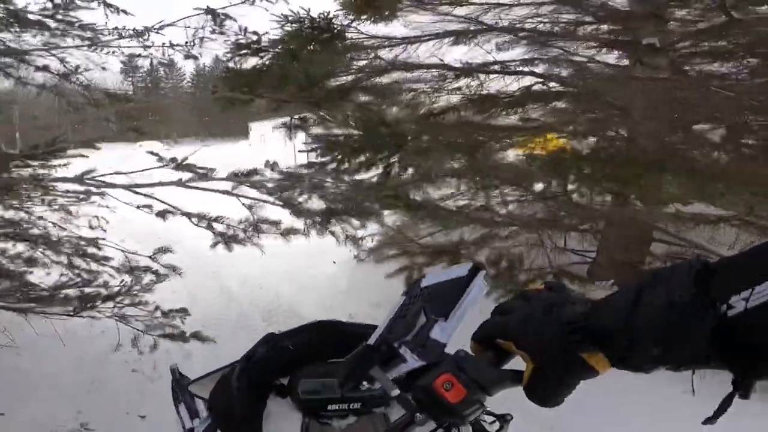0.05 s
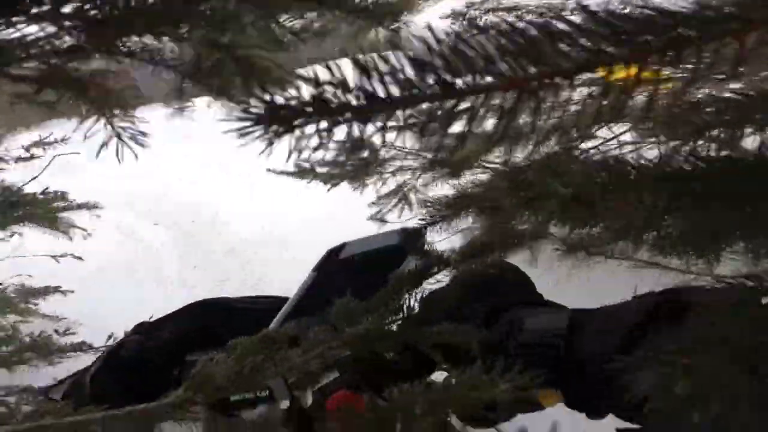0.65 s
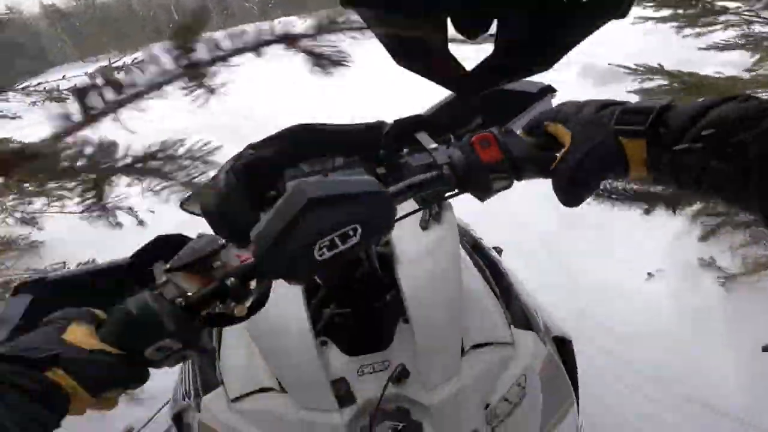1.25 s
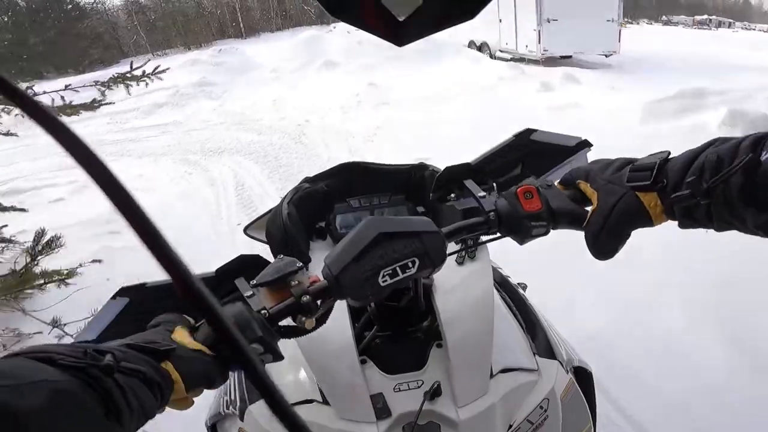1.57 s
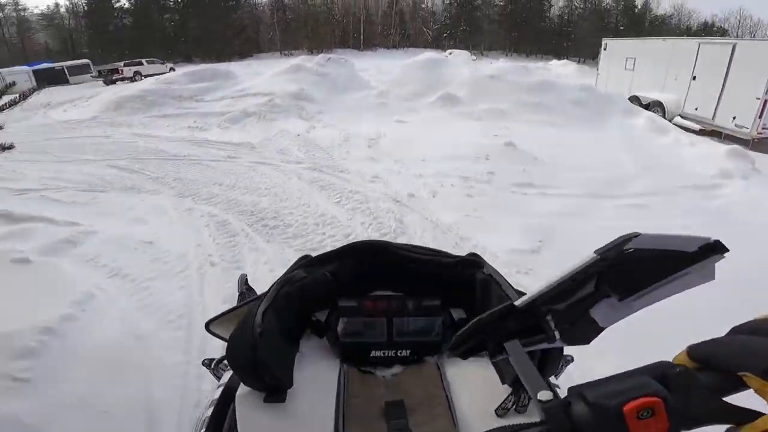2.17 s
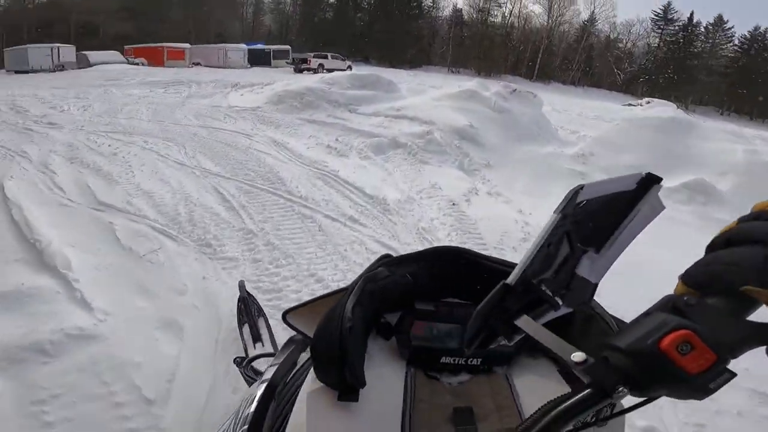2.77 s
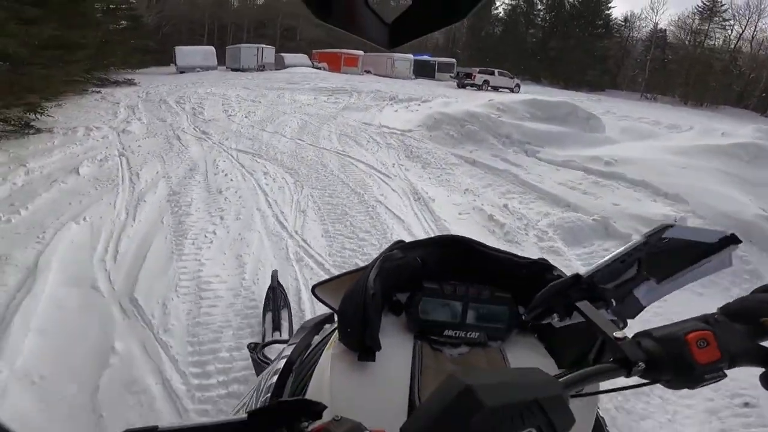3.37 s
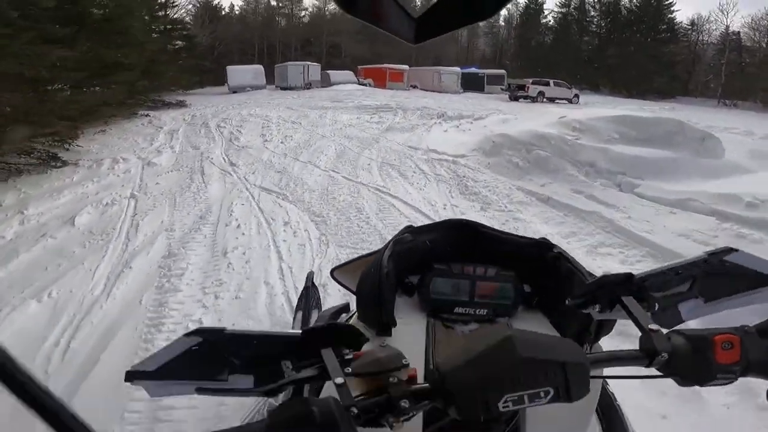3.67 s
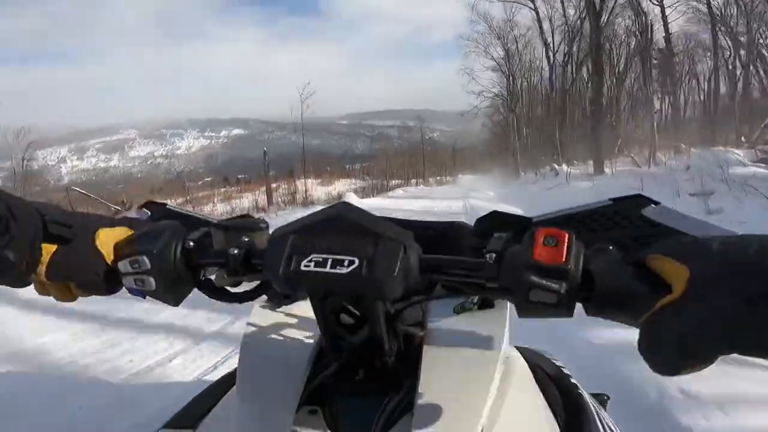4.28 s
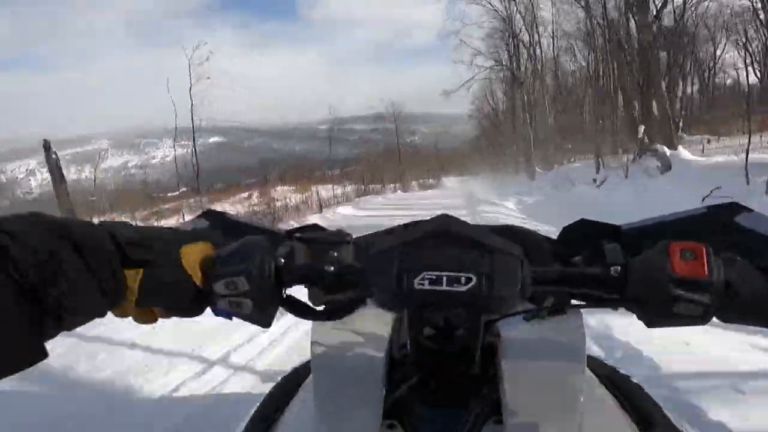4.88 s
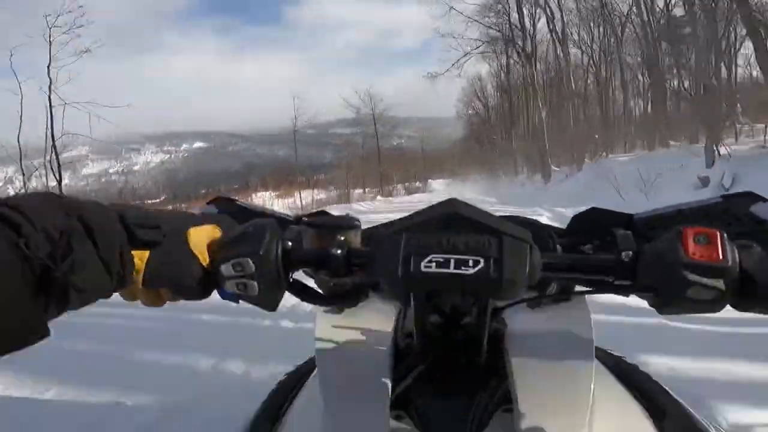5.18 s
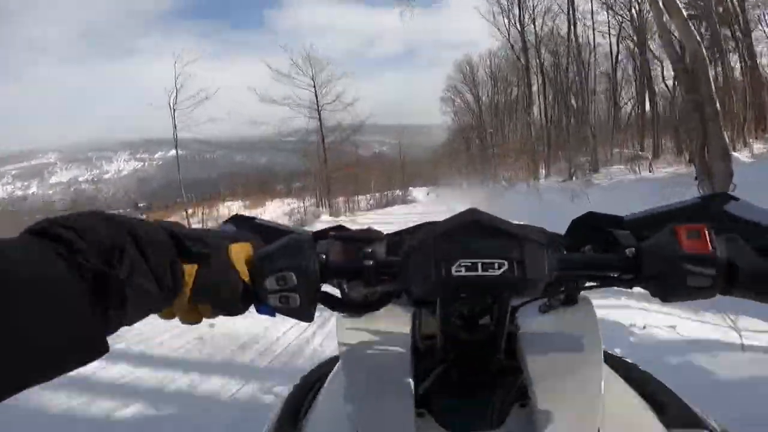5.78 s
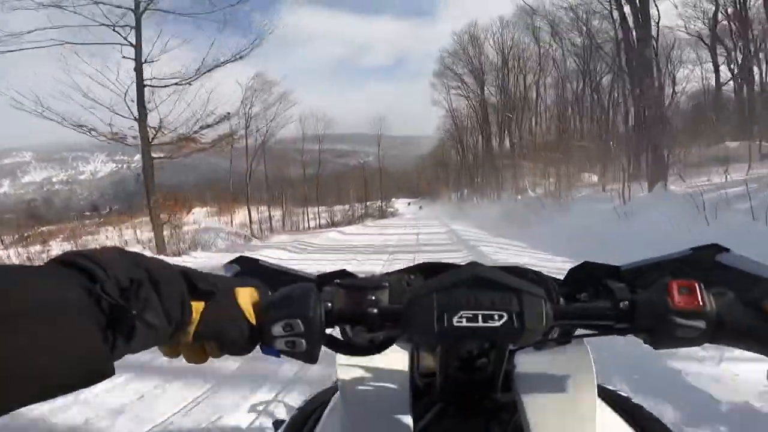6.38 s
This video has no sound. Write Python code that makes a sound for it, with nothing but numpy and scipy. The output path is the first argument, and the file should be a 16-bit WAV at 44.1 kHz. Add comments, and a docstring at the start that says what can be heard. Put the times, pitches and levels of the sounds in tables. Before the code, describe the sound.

Close snowmobile engine pushes slowly through scraping, snapping branches, belt chirping, then speeds down a trail in wind and eases off.

```python
"""A snowmobile engine lopes near idle, close below a microphone on the rider's helmet.
The three-cylinder four-stroke revs twice, exhaust booming and belt chirping, while spruce
branches scrape and snap past; then it crawls over open snow. After a short hush it runs fast
down a trail: a higher engine note, the whine of the track drive, wind buffeting the
microphone, one bump, and then the throttle eases."""
import sys
import numpy as np
from scipy import signal
from scipy.fft import rfft, irfft
from scipy.io import wavfile
from scipy.ndimage import uniform_filter1d

SR = 44100
rng = np.random.default_rng(int(sys.argv[2]) if len(sys.argv) > 2 else 0)


def persist_wave(psi):
    """Save psi, clipped to +-1, as 16-bit WAV."""
    counts = np.round(np.clip(psi, -1, 1) * 32767).astype(np.int16)
    wavfile.write(sys.argv[1], SR, np.atleast_2d(counts).T)


N = 292824
T, HZ = np.arange(N) / SR, np.fft.rfftfreq(N, 1 / SR)


def amp(db):
    """Decibels to gain."""
    return 10 ** (np.asarray(db) / 20)


def unit_rms(x):
    """Scales to rms 1."""
    return x / np.sqrt(np.mean(x ** 2) + 1e-20)


def noise():
    """White noise of rms 1."""
    return rng.standard_normal(N)


def sine(turns):
    """A tone of peak 1 from its phase in turns."""
    return np.sin(2 * np.pi * turns)


def swell(centre_s, half_s):
    """A smooth rise and fall of height 1."""
    return np.exp(-((T - centre_s) / half_s) ** 2)


def curves(rows):
    """Each column of a table, joined by straight lines in time."""
    times, *columns = np.transpose(rows)
    return [np.interp(T, times, column) for column in columns]


def spectrum_gain(points):
    """A spectrum as gain on a log-frequency axis, falling steeply past its ends."""
    hz, db = np.transpose(points)
    octave, known = np.log2(HZ + 1), np.log2(hz + 1)
    outside = np.maximum(known[0] - octave, 0) + np.maximum(octave - known[-1], 0)
    return amp(np.interp(octave, known, db) - 20 * outside)


def colour(x, points, band_hz=(0, SR / 2)):
    """Filters by (freq_hz, gain_db) points; the result has rms 1 inside the band."""
    spectrum = rfft(x) * spectrum_gain(points)
    in_band = (HZ >= band_hz[0]) * (HZ <= band_hz[1])
    return irfft(spectrum, N) / np.std(irfft(spectrum * in_band, N))


def wander(rate_hz):
    """Smooth random drift of rms 1, moving up to about the given rate."""
    count = 2048
    spectrum = rfft(rng.standard_normal(count)) / (1 + (HZ[:count // 2 + 1] / rate_hz) ** 4)
    return np.interp(T, np.linspace(0, T[-1], count), unit_rms(irfft(spectrum)))


def resonate(x, hz, width_hz):
    """Rings one resonance."""
    return signal.lfilter(*signal.iirpeak(hz, hz / width_hz, SR), x)


def response(hz, resonances):
    """Gain of a set of resonances for a tone at this pitch."""
    return sum(amp(db) / (1 + (2 * (hz - centre) / width) ** 2) for centre, width, db in resonances)


# skis and track on the snow below the rider: time_s, level_db
SNOW_LEVEL = [(0, -56), (.25, -63), (.6, -46), (1.55, -42), (1.78, -64), (2.2, -53.5), (3.74, -49)]
# hiss of the snow: freq_hz, gain_db
SNOW_SPECTRUM = [(800, -7.5), (2000, 1.5), (3200, 1), (5000, -11.5), (7500, -11.5), (9500, -22.5),
                 (12500, -25.5), (15000, -43)]


def snow():
    """A soft hiss under the skis and a faint rumble of the chassis."""
    level_db, = curves(SNOW_LEVEL)
    rumble = colour(noise(), [(12, -6), (25, -9), (45, -7.5), (70, -2.5)]) * amp(-38.5)
    hiss = colour(noise(), SNOW_SPECTRUM) * amp(level_db + 2.1 * wander(21))
    return hiss + rumble


# wind right on the microphone: freq_hz, gain_db
BUFFET_SPECTRUM = [(10, -8), (22, -11.5), (36, 8.5), (58, 1), (85, -4.5), (130, -7), (200, -20.5),
                   (400, -50.5)]
# air and snow rushing past the helmet: freq_hz, gain_db
ROAR_SPECTRUM = [(80, 11), (150, 1), (260, 8.5), (400, 0.5), (560, -4), (720, -16.5), (1000, -13.5)]


def wind():
    """Lumpy buffeting and the roar of air and flying snow build up at the start of the trail."""
    trail_s, build_s = 4.0, 0.14
    build_db = -6 * np.exp(-np.maximum(T - trail_s, 0) / build_s)
    lumps = colour(noise(), BUFFET_SPECTRUM)
    lumps /= np.sqrt(uniform_filter1d(lumps ** 2, size=5000))  # hold the level steady
    roar = colour(noise(), ROAR_SPECTRUM, band_hz=(370, 440))
    roar_db = -45.5 + 6.4 * fast_throttle() + wander(25)
    return (lumps * amp(-19) + roar * amp(roar_db)) * amp(build_db)


# the brake on the slow ride: centre_s, half_length_s, level_db
BRAKE_SQUEALS = [(.17, .09, -46), (0.662, 0.029, -44.5), (2.207, .14, -43), (3.5, 0.2, -43.5)]


def brake():
    """The brake squeals in a thin, unsteady whistle."""
    pitch_hz = 2040 * (1 + .009 * wander(70))
    envelope = sum(amp(db) * swell(s, half) for s, half, db in BRAKE_SQUEALS)
    return sine(np.cumsum(pitch_hz) / SR) * envelope * amp(3.5 * wander(30))


# track drive under the seat, its pitch set by ground speed: time_s, pitch_hz, level_db
TRACK_WHINE = [(4.12, 248, -31.5), (4.35, 253, -22), (4.6, 257, -25), (4.95, 267, -28.5), (5.5, 289, -33),
               (6.25, 301, -29), (6.64, 292, -29.5)]


def track():
    """Drive teeth mesh with the track in a fluttering tone."""
    hz, db = curves(TRACK_WHINE)
    turns = np.cumsum(hz) / SR + 0.058 * wander(34)
    harmonics_db = [-4, -25.5, -31, -33.5]
    tone = sum(amp(level) * sine(k * turns) for k, level in enumerate(harmonics_db, 1))
    return unit_rms(tone) * amp(db + 3.4 * wander(14))


# resonances of the gear case: centre_hz, width_hz, gain_db
GEAR_CASE = [(4385, 170, -56.5), (4820, 110, -57.5)]


def gears():
    """Meshing teeth whine with ground speed, louder at the case's resonances and under throttle."""
    meshes_per_track_cycle, floor_db = 16.5, -68.5
    hz = meshes_per_track_cycle * curves(TRACK_WHINE)[0]
    coast_db = -6.5 * (1 - fast_throttle())
    turns = np.cumsum(hz * (1 + .011 * wander(120))) / SR
    case_gain = amp(floor_db) + response(hz, GEAR_CASE)
    return np.sqrt(2) * sine(turns) * case_gain * amp(coast_db + 2.6 * wander(40))


def bump_and_ice():
    """The chassis thuds over a bump; later a chip of ice ticks against the hood."""
    bump_s, ice_s = 5.478, 6.146
    thud = colour(noise(), [(90, -10), (170, 0), (280, -2), (450, -13), (900, -30)])
    tick = colour(noise(), [(1100, -4.5), (1500, 6.5), (2100, -1), (2600, -16)])
    return amp(-11.5) * thud * swell(bump_s, .011) + amp(-36) * tick * swell(ice_s, .007)


# boughs rubbing on the windshield, an arm's length ahead, and one soft low thud of the sled:
# centre_s, half_length_s, level_db, pitch_hz
RUBS_AND_THUD = [(0.955, 0.028, -36, 936), (1.126, 0.029, -27, 975), (1.266, 0.024, -29, 676),
                 (1.345, 0.017, -24.5, 393), (1.555, .04, -23, 135), (1.604, .02, -32.5, 425)]


def rubs_and_thud():
    """Boughs set the plastic windshield groaning in narrow bands; the lowest band is the sled's thud."""
    sound = np.zeros(N)
    for s, half, db, hz in RUBS_AND_THUD:
        band = resonate(resonate(noise(), hz, 90), hz, 140)
        sound += unit_rms(band) * amp(db) * swell(s, half)
    return sound


# how closely the spruce presses in on the rider: time_s, closeness_db
THICKET = [(.2, -14), (.4, -8.5), (1.53, 1), (1.75, -8), (2, -9.5), (2.3, -46)]
# single boughs swishing past the microphone: centre_s, half_length_s, level_db
SWISHES = [(0.328, 0.024, -47), (0.956, 0.04, -49), (1.173, 0.042, -46), (1.289, .035, -41.5)]
# needles on helmet and hood: freq_hz, gain_db
NEEDLE_SPECTRUM = [(300, -6), (900, 14), (2000, 5.5), (3000, -3), (5500, 0), (7500, -8.5), (9500, -23),
                   (12500, -20), (15500, -35)]


def needles():
    """Spruce needles scrape past in clumps of tiny clicks."""
    near_db, = curves(THICKET)
    clicks_per_s = 4000
    clicks = noise() * amp(3.5 * np.minimum(rng.exponential(1, N), 5))
    clicks *= rng.random(N) < clicks_per_s / SR
    clicks *= amp(0.95 * wander(50))
    passing = amp(-46.5 + near_db) + sum(amp(db) * swell(s, half) for s, half, db in SWISHES)
    return colour(clicks, NEEDLE_SPECTRUM, band_hz=(3500, 14000)) * passing


# twigs on the helmet, right beside the microphone: start_s, strength_db, knock_offset_db
TWIG_SNAPS = [(.320, -24.5, -2.5), (0.336, -35.5, 5.5), (0.58, -36, -1), (0.95, -27.5, -7.5),
              (1.134, -30.5, -3.5), (1.157, -29.5, -2), (1.183, -24.5, -15.5), (1.204, -27.5, -18),
              (1.344, -30.5, 14), (1.389, -29.5, -2), (1.512, -20, 3), (1.523, -33, -6.5),
              (1.54, -23, -0.5), (1.744, -39.5, -15)]


def twigs():
    """Each twig snaps with a bright crack and a lower knock that lasts a little longer."""
    crack_decay_s, knock_decay_s = .0045, .01
    crack_envelope, knock_envelope = np.zeros(N), np.zeros(N)
    for start_s, db, knock_db in TWIG_SNAPS:
        age = np.maximum(T - start_s, 0)
        crack_envelope += amp(db) * (age > 0) * np.exp(-age / crack_decay_s)
        knock_envelope += amp(db + knock_db) * (age > 0) * np.exp(-age / knock_decay_s)
    crack = colour(noise(), [(900, 4), (2800, 5), (4200, 5.5), (8000, -4), (12500, -12.5), (15500, -22)])
    knock = colour(noise(), [(120, -6), (380, 4), (700, -0.5), (1500, -12)])
    return 0.52 * crack * crack_envelope + knock * knock_envelope


def crank(hz, jitter):
    """Counts firings, with slightly unsteady timing, and four-stroke cycles of three firings."""
    firings = np.cumsum(hz) / SR + jitter * wander(53)
    return firings, firings / 3


def overtones(cycles, orders, waver_db):
    """Firing orders (every third) line up into steep pressure fronts; the rest fall at any phase."""
    phases = [rng.random() * (k % 3 > 0) for k, _ in orders]
    waves = (amp(db + waver_db * wander(10)) * sine(k * cycles + phase)
             for (k, db), phase in zip(orders, phases))
    return -unit_rms(sum(waves))


def knocks(firings, cycles, repeat, depth, length):
    """A burst of noise at each firing; the share `repeat` recurs exactly with every engine cycle."""
    cycle_samples = round(SR * T[-1] / cycles[-1])
    pattern = signal.resample(rng.standard_normal(cycle_samples), 8 * cycle_samples)
    locked = np.interp(cycles % 1, np.linspace(0, 1, len(pattern)), pattern)
    burst = 1 + depth * np.exp(-(firings % 1) / length)
    return burst * (np.sqrt(repeat) * locked + np.sqrt(1 - repeat) * noise())


def in_tune(hz, centre_hz, half_hz, peak_db):
    """Decibels gained as the engine passes a firing rate that suits the exhaust."""
    return peak_db * np.exp(-((hz - centre_hz) / half_hz) ** 2)


# engine speed through the spruce and over open snow: time_s, firing_hz
SLOW_SPEED = [(0, 87), (.2, 68), (.33, 62.5), (.57, 89.5), (.76, 99.4), (1, 103), (1.17, 102), (1.55, 93),
              (1.83, 63), (1.91, 79), (2.12, 101.5), (2.22, 102.5), (2.4, 98.7), (2.8, 95.4), (3.35, 95.2),
              (3.76, 93.4)]
# the rider's thumb on the throttle: press_s, release_s, opening (about 1 = the first, firmer squeeze)
THROTTLE_SQUEEZES = [(0.294, 1.526, 1.02), (1.835, 3.9, 0.8)]


def slow_drive():
    """Firing rate, throttle, and the surge of load while the engine gains speed."""
    hz, = curves(SLOW_SPEED)
    rise_s, fall_s, full_climb_hz_per_s = .035, .09, 122
    throttle = np.zeros(N)
    for press_s, release_s, opening in THROTTLE_SQUEEZES:
        pressed = np.clip((T - press_s) / rise_s, 0, 1)
        throttle += opening * pressed * np.exp(-np.maximum(T - release_s, 0) / fall_s)
    climb = uniform_filter1d(np.gradient(hz) * SR, size=3000)
    return hz, throttle, np.clip(climb / full_climb_hz_per_s, 0, 1)


def slow_level(base_db, throttle_db, surge_db, db_per_octave):
    """Level in dB of one engine part as it answers throttle, surge and speed."""
    hz, throttle, surge = slow_drive()
    crawl_hz = 95
    return base_db + throttle_db * throttle + surge_db * surge + db_per_octave * np.log2(hz / crawl_hz)


# hard slips of the clutch belt under the hood: centre_s, half_length_s, level_db, pitch_hz
BELT_SLIPS = [(1.0, .45, -40, 1542), (1.47, 0.11, -33, 1560), (1.92, .04, -32.5, 1516),
              (2.25, 0.092, -40, 1387), (2.7, 0.29, -39.5, 1430), (2.8, 0.076, -37, 1612),
              (3.056, .014, -28, 1374), (3.21, .015, -35.5, 1540)]


def belt(firings):
    """The belt sings near one pitch and chirps at every power stroke, louder in spells of hard slip."""
    sing_hz = 1541
    sing_db = slow_level(-47, throttle_db=-1, surge_db=4, db_per_octave=3.5)
    chirps = np.exp(1.1 * np.cos(2 * np.pi * firings)) * amp(2 * wander(40) + 2.5 * wander(9))
    wavering_time = np.cumsum(1 + .022 * wander(70) + .018 * wander(10)) / SR
    spells = [(amp(sing_db), sing_hz)]
    spells += [(amp(db) * swell(s, half), hz) for s, half, db, hz in BELT_SLIPS]
    return sum(gain * unit_rms(chirps * sine(hz * wavering_time)) for gain, hz in spells)


# exhaust overtones at low speed: cycle_multiple, relative_db
SLOW_ORDERS = [(4, -25.5), (5, -28), (7, -42), (8, -13), (9, -6), (10, -39), (11, -39.5), (12, -18),
               (13, -15), (14, -23), (15, -34.5), (16, -31), (18, -23.5), (19, -23), (20, -30.5),
               (21, -20.5), (23, -38.5), (24, -26.5), (27, -42.5), (30, -42)]
# engine casing and clutch, just ahead of the rider's knees: freq_hz, gain_db
CASING_SPECTRUM = [(40, 4), (110, 16), (300, 6.5), (470, 9), (580, 2.5), (850, 1), (1130, -7), (1380, 0.5),
                   (1600, -1.5), (1850, -6), (2080, -10.5), (2450, -18), (5000, -28), (9000, -47),
                   (13000, -61.5)]
# airbox resonance, met by the fourth firing order near idle: centre_hz, width_hz, gain_db
AIRBOX = [(256, 45, -.5)]


def slow_engine():
    """Booming exhaust, ringing pipe, airbox hum, clatter and belt, all tied to the crankshaft."""
    hz, throttle, surge = slow_drive()
    boom_db = slow_level(-12, throttle_db=-1, surge_db=-0.7, db_per_octave=5)
    octave_db = slow_level(-25, throttle_db=-0.5, surge_db=6.5, db_per_octave=0)
    bark_db = slow_level(-30, throttle_db=7, surge_db=0, db_per_octave=4.5)
    ring_db = slow_level(-34.5, throttle_db=1, surge_db=1.5, db_per_octave=4)
    clatter_db = slow_level(-38.5, throttle_db=1.82, surge_db=2.5, db_per_octave=8.5)
    octave_db += in_tune(hz, centre_hz=102, half_hz=1.8, peak_db=3.2)
    ring_db += in_tune(hz, centre_hz=92.8, half_hz=3, peak_db=5.3) * (1 - surge)
    ring_db += in_tune(hz, centre_hz=80, half_hz=9.9, peak_db=13.6) * surge
    # off throttle the cylinders fire unevenly, most of all near idle
    idle_hz, lope_fade_hz = 68, 18
    lope = 0.69 * np.maximum(1 - throttle, 0) * np.exp((idle_hz - hz) / lope_fade_hz)
    firings, cycles = crank(hz, jitter=0.0035 + .1 * lope)
    # one cylinder in three is weak, and no two firings are alike
    unevenness = 0.52 * np.cos(2 * np.pi * cycles) + .5 * wander(50)
    strength = (1 + lope * unevenness) / np.sqrt(1 + lope ** 2)
    boom = -np.sqrt(2) * (sine(firings) * amp(boom_db) + sine(2 * firings) * amp(octave_db))
    bark = overtones(cycles, SLOW_ORDERS, waver_db=1.3) * (1 + .08 * wander(60)) * amp(bark_db)
    # each puff of exhaust rings the pipe, which lifts whichever order sweeps past
    puffs = np.exp(-(firings % 1) / .08) * (1 + .15 * wander(60) + .9 * noise())
    ring = unit_rms(resonate(resonate(puffs, 463, 60), 471, 110)) * amp(ring_db)
    impacts = knocks(firings, cycles, repeat=.5, depth=1.6, length=.35) * amp(.7 * wander(45))
    clatter = colour(impacts, CASING_SPECTRUM, band_hz=(1000, 2200)) * amp(clatter_db)
    hum = np.sqrt(2) * sine(4 * firings) * response(4 * hz, AIRBOX) * amp(bark_db)
    return strength * (boom + bark + ring - hum) + clatter + belt(firings)


# throttle down the trail: time_s, opening (0 to 1)
FAST_THROTTLE = [(4, 0.61), (5.69, 1), (5.8, 0.1), (6.4, 0.01), (6.64, .6)]


def fast_throttle():
    """The rider opens up fully, lets go after the bump and squeezes again at the end."""
    return curves(FAST_THROTTLE)[0]


# engine speed down the trail: time_s, firing_hz
FAST_SPEED = [(4, 149.3), (4.17, 154.7), (4.5, 160), (4.82, 168.4), (5.4, 175.7), (5.58, 183.5),
              (5.69, 186), (5.8, 173.5), (5.92, 165), (6.3, 152.5), (6.5, 143.5), (6.64, 130)]
# strong tones of the engine note: firing_multiple, throttle_shut_db
FIRING_ORDERS = [(1, -1), (2, -5), (3, -13.5), (6, -14), (9, -8.5), (10, -15)]
# exhaust and airbox resonances, lifting each order that sweeps through: centre_hz, width_hz, gain_db
EXHAUST_RESONANCES = [(131.8, 17.7, -17), (183, 12, -30.5), (304.8, 40.4, -19), (455, 70, -33.5),
                      (551, 73, -28.5), (1050, 41, -43.5), (1500, 67, -41)]
# overtones of the growl: cycle_multiple, relative_db
GROWL_ORDERS = [(4, 1), (5, -11.5), (7, -3), (8, -0.5), (10, -14.5), (11, -13), (12, -7), (13, -15),
                (15, -13.5), (18, -16.5), (23, -14), (26, -20.5), (27, -19), (29, -21), (30, -18.5)]
# the body's resonances, buzzing under load: freq_hz, gain_db
SNARL_SPECTRUM = [(850, -11), (980, -9.5), (1060, 10), (1170, -5), (1340, 6), (1440, 6.5), (1550, 8.5),
                  (1900, -5), (2500, -6), (3000, -8), (3450, -16.5), (4400, -14), (5000, -14),
                  (6000, -29.5), (7500, -30.5)]
# the engine's rasp at speed: freq_hz, gain_db
RASP_SPECTRUM = [(500, 3), (750, 8), (950, -18), (1200, -4), (1550, 2.5), (1800, -5), (2050, -11),
                 (2500, -8), (3000, -13.5), (3450, -17), (4200, -10.5), (5000, -14), (5800, -21),
                 (7000, -29.5), (8500, -38), (14000, -43.5)]


def fast_engine():
    """Firings sound the exhaust over a rasp; the growl and bright snarl fade as the throttle eases."""
    hz, = curves(FAST_SPEED)
    throttle = fast_throttle()
    load_db, rasp_db = -43 + 11.85 * throttle, -46 - 0.85 * throttle
    firings, cycles = crank(hz, jitter=.003)
    note = np.zeros(N)
    for k, shut_db in FIRING_ORDERS:
        gain = response(k * hz, EXHAUST_RESONANCES) * amp(shut_db * (1 - throttle) + 1.3 * wander(8.2))
        note += gain * np.sqrt(2) * sine(k * firings)
    growl = overtones(cycles, GROWL_ORDERS, waver_db=1) * amp(load_db)
    # the pattern of knocks repeats every cycle and changes only slowly
    buzz = sum(wander(2) * knocks(firings, cycles, repeat=.81, depth=.62, length=.33) for _ in range(4))
    buzz /= np.sqrt(uniform_filter1d(buzz ** 2, size=4000))  # hold the level steady
    snarl = colour(buzz, SNARL_SPECTRUM, band_hz=(1000, 2200)) * amp(load_db - 9.5)
    loose_knocks = knocks(firings, cycles, repeat=.054, depth=.53, length=.57)
    rasp = colour(loose_knocks, RASP_SPECTRUM, band_hz=(1000, 2200)) * amp(rasp_db + 1.2 * wander(25))
    return note + growl + snarl + rasp


# stereo width at the helmet: freq_hz, side_gain_db
WIDTH_SPECTRUM = [(60, -41.5), (140, -47.5), (320, -32.5), (490, -20.5), (750, -12), (1200, -7),
                  (2600, -1.5), (6000, -5.5), (12000, 0)]


def scatter(mid):
    """Scattering round helmet and branches makes the ears differ; the open trail is almost mono."""
    near_db, = curves(THICKET)
    side_db = np.where(T < FAST_FADE[0][0], near_db - 2.5, -48.5)
    # which ear leads changes at random along the spectrum
    count = 1200
    lead = np.sign(np.interp(HZ, np.linspace(0, SR / 2, count), rng.standard_normal(count)))
    side = irfft(rfft(mid) * spectrum_gain(WIDTH_SPECTRUM) * 1j * lead, N) * amp(side_db)
    return np.array([mid + side, mid - side])


# the slow ride stops short: time_s, gain_db
SLOW_FADE = [(3.752, 0), (3.765, -9), (3.777, -32), (3.8, -60), (3.85, -80)]
# the fast ride fades in: time_s, gain_db
FAST_FADE = [(3.9, -70), (3.94, -40), (3.96, -17), (3.975, -13), (4, -2), (4.03, 0)]


def scene():
    """Two rides in turn, heard at the helmet: the bass is central, the branches very wide."""
    (slow_db,), (fast_db,) = curves(SLOW_FADE), curves(FAST_FADE)
    dip_db = -8 * swell(5.511, .022)  # the level dips briefly after the bump
    slow = (slow_engine() + brake() + snow() + rubs_and_thud()) * amp(slow_db)
    fast = (fast_engine() + gears() + track() + wind() + bump_and_ice()) * amp(fast_db + dip_db)
    rides = scatter(slow + fast)
    branches = scatter(needles() + twigs()) * amp([[.8], [-.8]])  # a little to the left
    return rides + branches


def record(dry):
    """The recorder's band limit."""
    edge_hz = 15500
    lowpass = signal.firwin(511, edge_hz, window=("kaiser", 9), fs=SR)
    return signal.oaconvolve(dry, lowpass[None], "same")


dry = scene()
out = record(dry)
persist_wave(out)
```